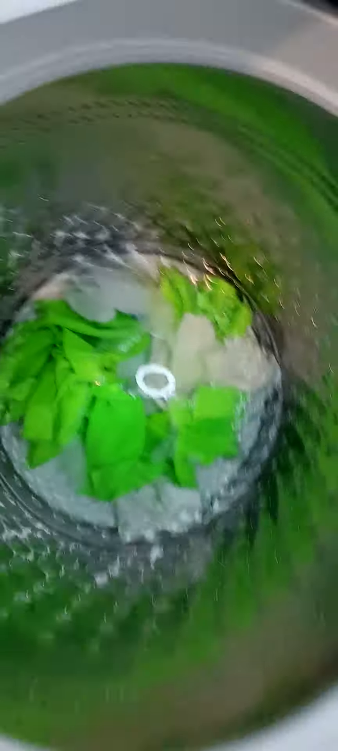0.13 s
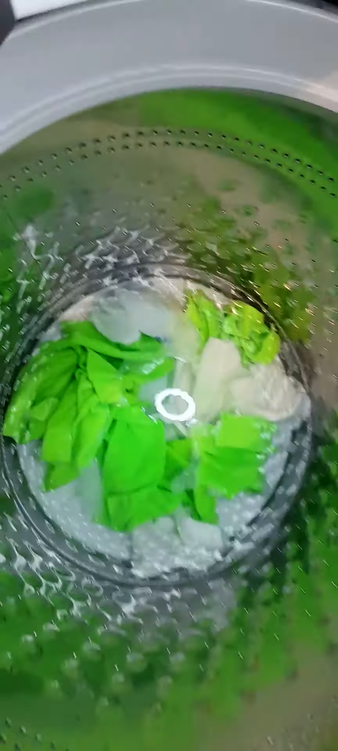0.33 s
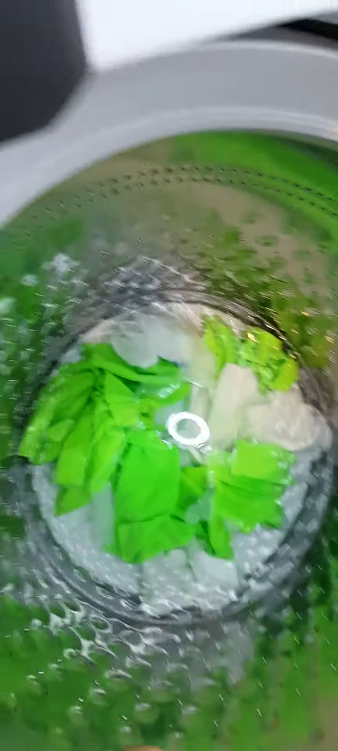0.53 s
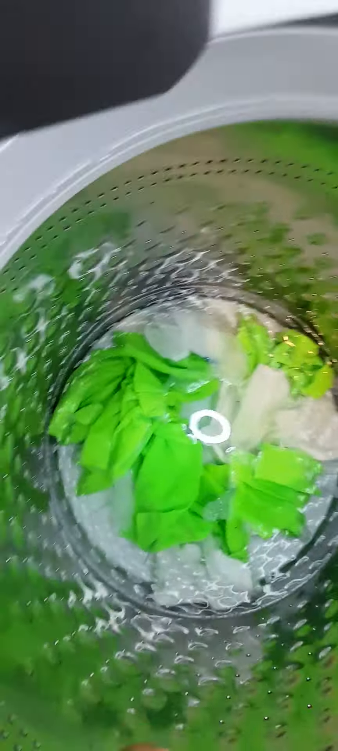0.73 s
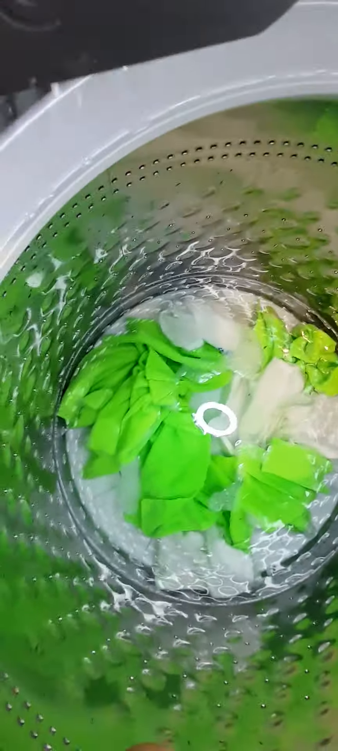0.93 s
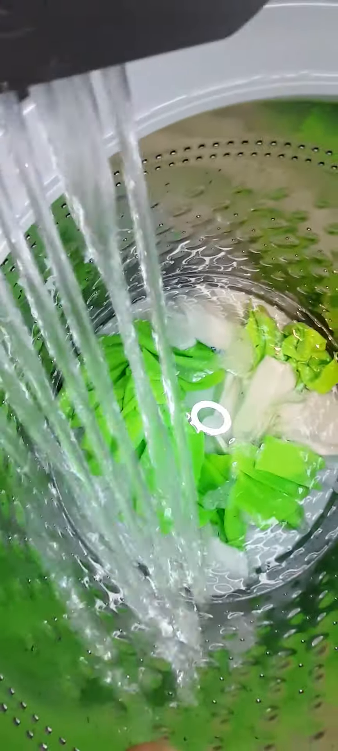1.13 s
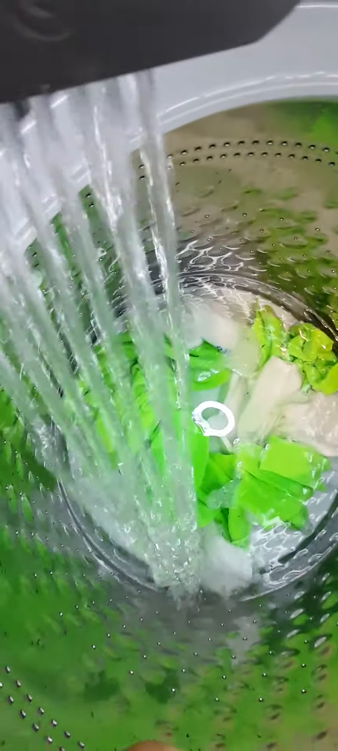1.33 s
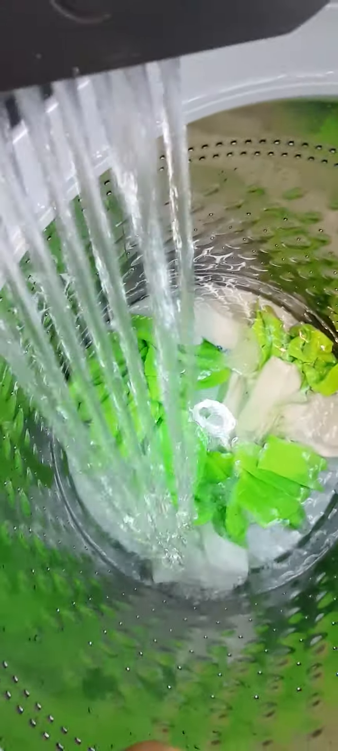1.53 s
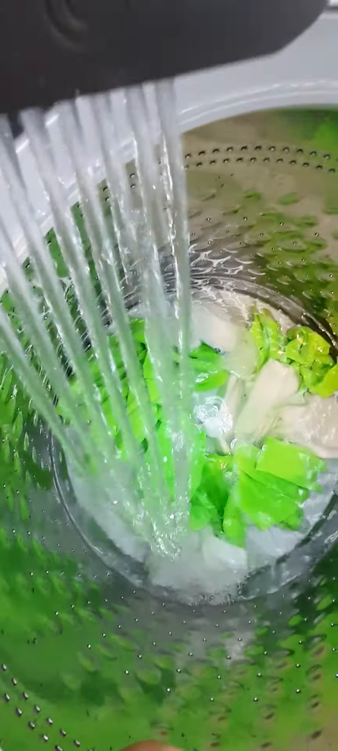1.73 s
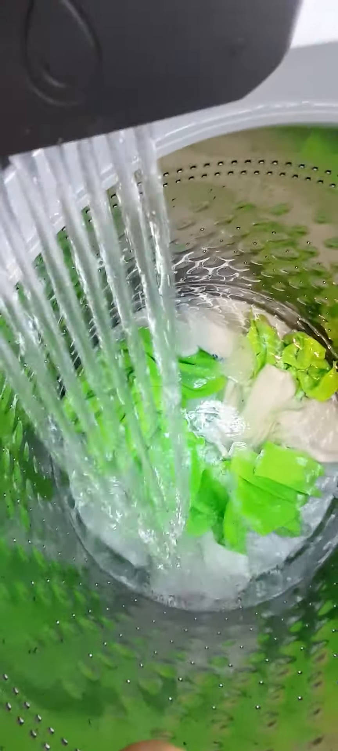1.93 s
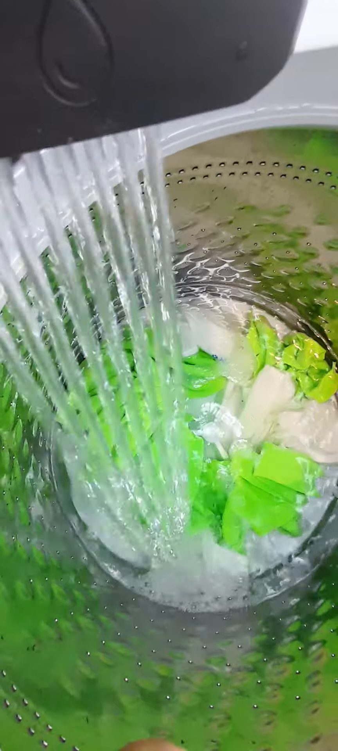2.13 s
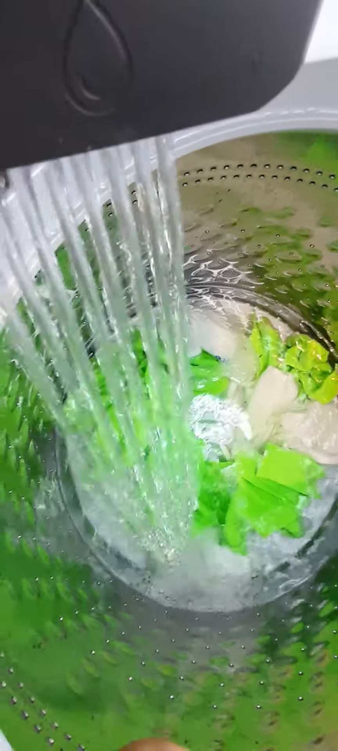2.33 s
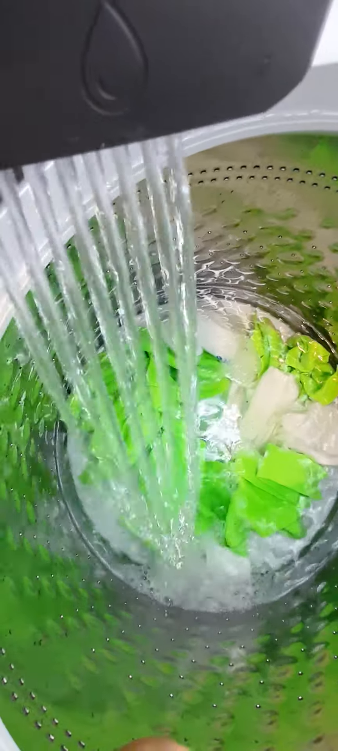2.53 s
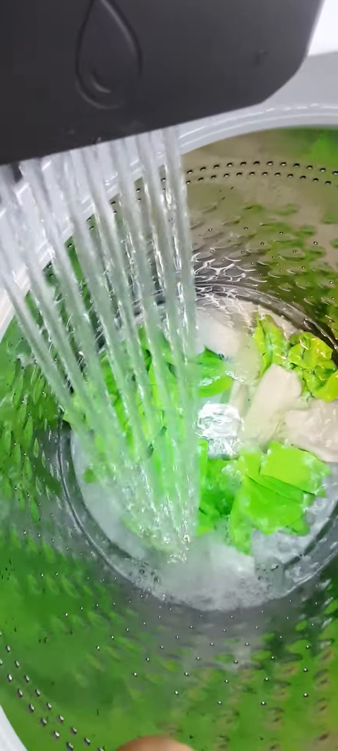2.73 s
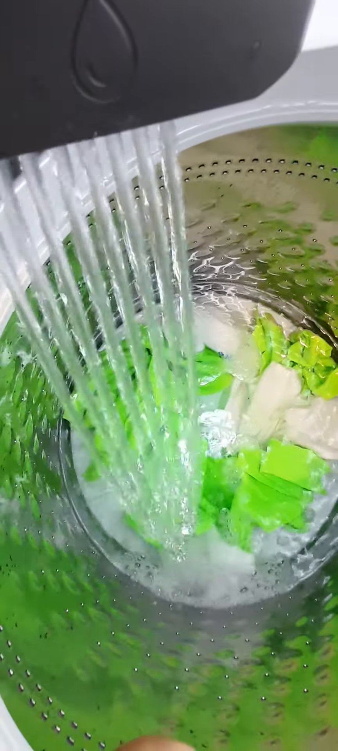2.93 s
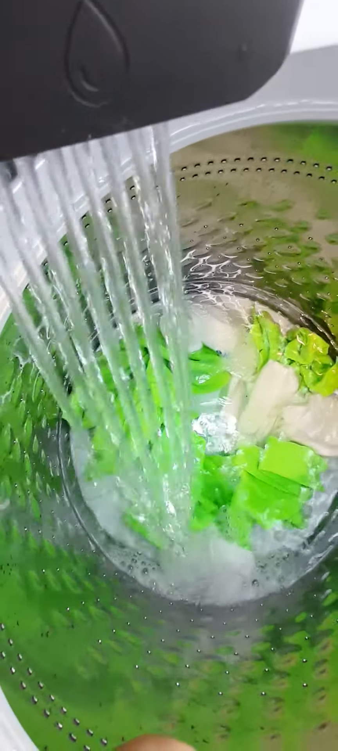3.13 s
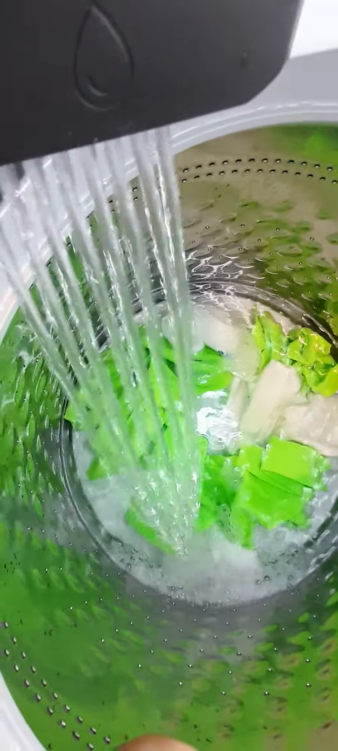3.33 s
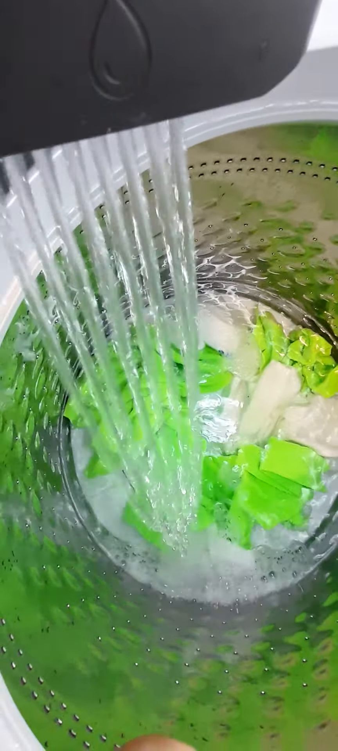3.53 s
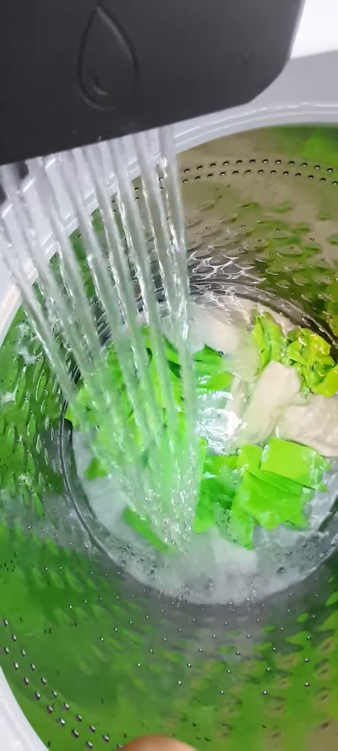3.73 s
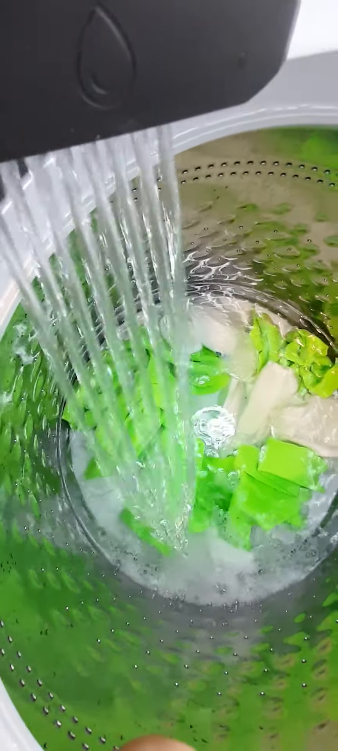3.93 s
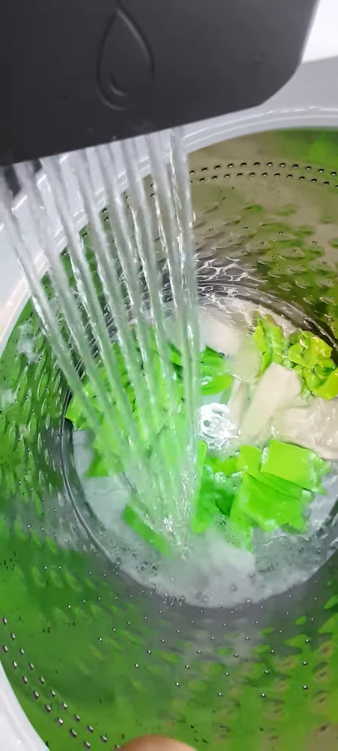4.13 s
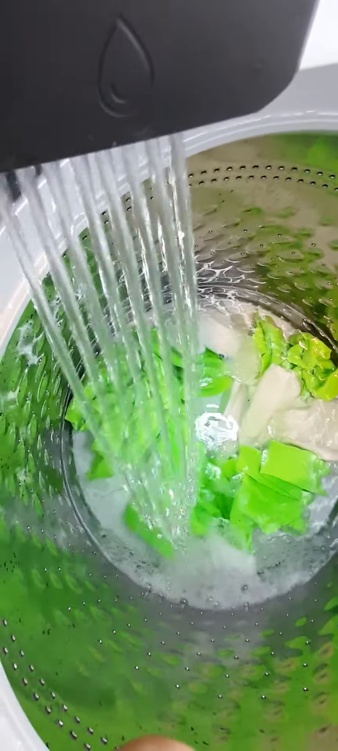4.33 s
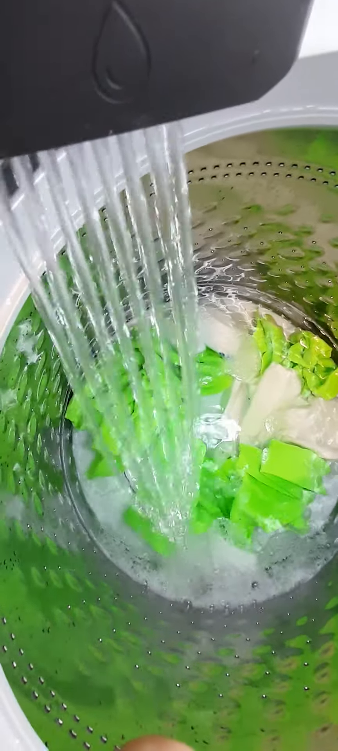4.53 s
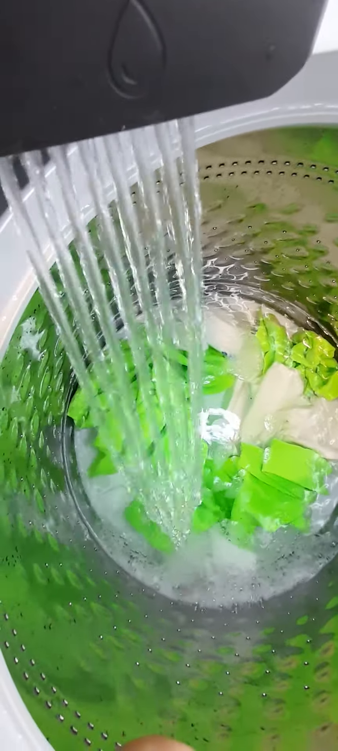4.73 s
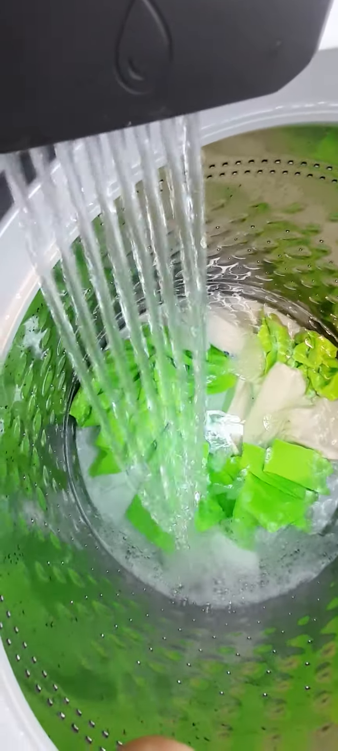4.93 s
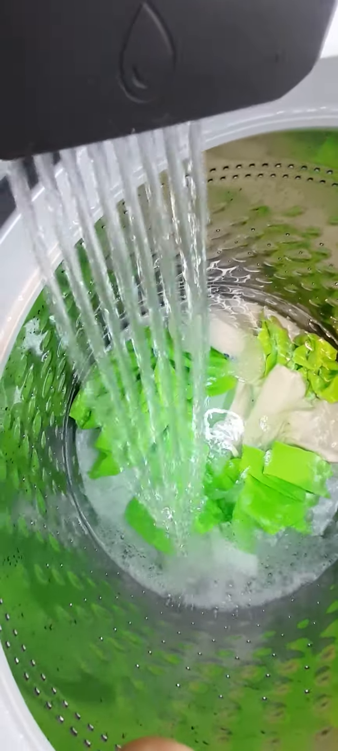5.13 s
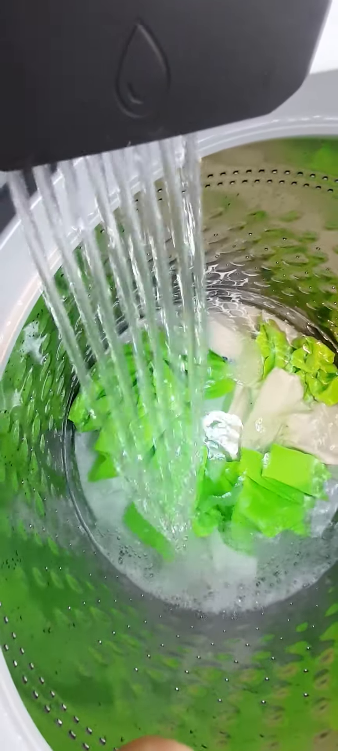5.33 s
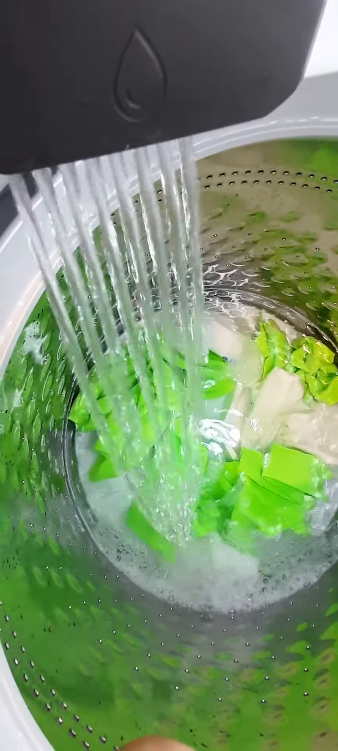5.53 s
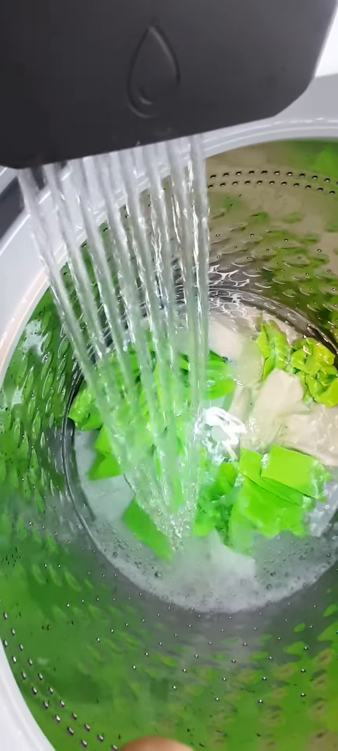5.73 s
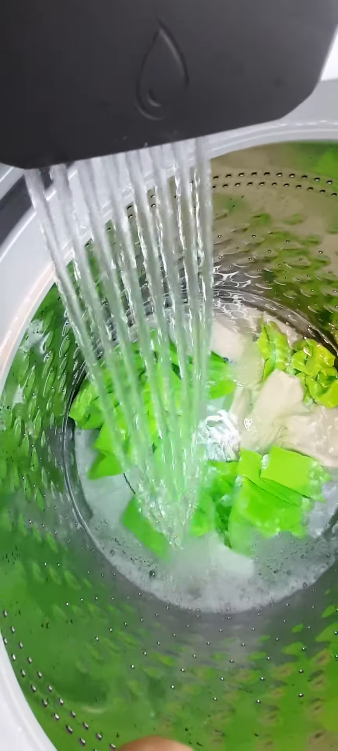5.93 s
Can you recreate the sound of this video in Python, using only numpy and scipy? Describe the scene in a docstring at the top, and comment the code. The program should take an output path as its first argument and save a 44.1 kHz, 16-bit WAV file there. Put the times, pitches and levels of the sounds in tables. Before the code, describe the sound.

Near silence with light ticks, then abruptly a strong water spray inside a hollow steel drum. The first hit is loudest and brightest, with a low thump and electrical hum beneath. Within half a second it softens onto soaked cloth and shallow water, staying a constant rushing hiss sprinkled with fat drop slaps and rising bubble gulps. Close stereo microphone just above the drum, indoors; the water is still running at the end.

```python
"""Laundry: a top-loading washing machine starts to fill, heard from just above the open drum.
After faint ticks over a quiet room the inlet valve opens with a mains hum (harmonics) and the tub booms.
A fan of jets sweeps down the steel wall onto the laundry: random impacts with dense echoes make the hiss,
and drive resonators for the hollow drum. Fat drops slap as noise bursts; bubbles are short rising rings."""
import sys
import numpy as np
from scipy import signal
from scipy.fft import rfft, irfft, next_fast_len
from scipy.io import wavfile

SR = 44100
rng = np.random.default_rng(int(sys.argv[2]) if len(sys.argv) > 2 else 0)


def file_out(sig):
    """Save sig as 16-bit WAV at sys.argv[1]."""
    # one column per channel
    cols = np.atleast_2d(sig).T
    # limit, then scale
    lim = np.clip(cols, -1, 1)
    pcm = np.round(lim * 32767).astype(np.int16)
    wavfile.write(sys.argv[1], SR, pcm)


N = 268128


def from_db(db):
    """Decibels to amplitude gain."""
    return 10 ** (np.asarray(db) / 20)


def rms_one(x):
    """Scale to unit power."""
    return x / np.sqrt(np.mean(x ** 2) + 1e-20)


def at_hz(points, hz):
    """Read a spectrum on a log-frequency axis."""
    knots_hz, values = np.transpose(points)
    return np.interp(np.log(hz + 1e-9), np.log(knots_hz), values)


def panned(pan_db):
    """Left and right gains for a left-right level difference."""
    return from_db(np.array([[.5], [-.5]]) * pan_db)


def coloured(x, spectrum, pan=None):
    """Filter to a smooth spectrum, optionally leaning left or right by frequency."""
    size = next_fast_len(x.shape[-1] + 2048)
    hz = np.fft.rfftfreq(size, 1 / SR)
    gain = from_db(at_hz(spectrum, hz))
    if pan is not None:
        gain = gain * panned(at_hz(pan, hz))
    return irfft(rfft(x, size) * gain, size)[..., :x.shape[-1]]


def drift(rate_hz):
    """Slow random wander of unit rms: noise through two equal low-pass poles, run every 20 samples."""
    r = np.exp(-40 * np.pi * rate_hz / SR)
    noise = rng.standard_normal(N // 20 + 2002)
    slow = signal.lfilter([1], [1, -2 * r, r * r], noise)[2000:]  # drop the filter's start-up
    return np.interp(np.arange(N) / 20, np.arange(len(slow)), rms_one(slow))


def stereo_noise(side_db):
    """White noise common to both ears plus an opposed part at side_db."""
    mid, side = rng.standard_normal((2, N))
    return mid + from_db(side_db) * side * [[1], [-1]]


def add(out, s, sound):
    """Mix a short sound in at s seconds."""
    start = int(np.clip(s * SR, 0, N - 1))
    out[:, start:start + sound.shape[-1]] += sound[..., :N - start]


def ramp(start_s, length_s):
    """Rise from 0 to 1 over a span of time."""
    return np.clip((np.arange(N) / SR - start_s) / length_s, 0, 1)


def swells(rows, attack_db_per_s, release_db_per_s):
    """Gain of events that each swell, hold and fade; the strongest one leads."""
    t = np.arange(N) / SR
    levels_db = []
    for full_s, held_s, level_db in rows:
        attack_db = attack_db_per_s * np.maximum(full_s - t, 0)
        release_db = release_db_per_s * np.maximum(t - full_s - held_s, 0)
        levels_db.append(level_db - attack_db - release_db)
    return from_db(np.maximum(np.max(levels_db, axis=0), -200))


def surge(peak_s, db, rise_s, settle_s):
    """Extra decibels that build to a peak and settle back."""
    return db * (ramp(peak_s - rise_s, rise_s) - ramp(peak_s, settle_s))


def impacts(per_s, spread_db, largest):
    """Drops land at random in each ear, many small and few large; unit power."""
    sizes = from_db(spread_db * np.minimum(rng.exponential(1, (2, N)), largest))
    signs = rng.choice([-1, 1], (2, N))
    landed = rng.random((2, N)) < per_s / SR
    return rms_one(sizes * signs * landed)


def drum_echoes(x, t60_s, wet_db):
    """The steel wall scatters each impact into a short dense tail at both ears."""
    t = np.arange(SR // 8) / SR
    tail = rng.standard_normal((2, len(t))) * from_db(-60 * t / t60_s)
    tail /= np.sqrt(np.sum(tail ** 2, axis=1, keepdims=True))
    mono = x[:1] + x[1:]
    return x + from_db(wet_db) * signal.oaconvolve(mono, tail, axes=1)[:, :N]


def bursts(events, spectrum, t60_s, crack_t60_s, crack_db):
    """Each small blow is a crack plus a ragged scatter of noise, coloured about its own centre."""
    ragged_db = 5
    out, t = np.zeros((2, N)), np.arange(SR // 8) / SR
    shape = from_db(-60 * t / t60_s) + from_db(crack_db - 60 * t / crack_t60_s)
    knots_s = t[::64]
    for start_s, level_db, centre_hz in events:
        ragged = from_db(ragged_db * np.interp(t, knots_s, rng.uniform(-1, 1, len(knots_s))))
        noise = rng.standard_normal((2, len(t))) * shape * ragged
        burst = coloured(noise, np.array(spectrum) * [centre_hz, 1])
        add(out, start_s, from_db(level_db) * burst / np.abs(burst.mean(0)).max())
    return out


def quiet_room():
    """Low filtered-noise rumble, a faint swelling hiss and a few light ticks."""
    # room rumble filter: hz, gain_db
    room_colour = [(20, -30), (32, -27), (42, -14), (56, 1), (66, -5), (80, -1), (110, -4.5), (135, -16),
                   (184, -28), (280, -26.5), (330, -20), (380, -33), (600, -39.5), (2000, -47)]
    # faint hiss filter: hz, gain_db
    hiss_colour = [(1760, -38), (3000, -16), (4470, -14), (5920, -10), (7350, -1.5), (8950, -10),
                   (15100, -1), (16000, -16)]
    # hiss swells: full_from_s, held_s, level_db (before trim)
    hiss_swells = [(0.11, 0.03, -71), (0.35, 0.04, -71.5), (0.48, 0.046, -73)]
    # light ticks: start_s, peak_db (before trim), centre_hz
    ticks = [(0.203, -54, 850), (0.264, -51, 750), (0.351, -55, 700), (0.588, -61, 950)]
    # tick filter: multiple_of_centre, gain_db
    tick_colour = [(.2, 1), (.5, 5), (1.2, -8), (2.2, -22), (4.5, -18), (10, -19), (20, -28)]
    room_db, hiss_db, fade_db_per_s = -59, -77.5, 130

    low_noise = signal.lfilter([1], [1, -.8], stereo_noise(side_db=-10.5))
    rumble = from_db(room_db) * rms_one(coloured(low_noise, room_colour))
    level = from_db(hiss_db + 1.2 * drift(15))
    level = level + from_db(-3.5) * swells(hiss_swells, fade_db_per_s, fade_db_per_s)
    hiss = level * rms_one(coloured(stereo_noise(side_db=0.5), hiss_colour))
    ticking = bursts(ticks, tick_colour, t60_s=0.049, crack_t60_s=.006, crack_db=3)
    return rumble + hiss + from_db(-2.5) * ticking


def valve(level_db):
    """The solenoid buzzes at harmonics of twice the mains rate, with slight phase wander."""
    # hum partials: multiple_of_hum_rate, relative_db, left_right_db
    partials = [(1, 1.5, 6.5), (2, -17.5, 6), (3, -10.5, 0.5), (4, -35, 0)]
    hum_hz = 120
    phase = 2 * np.pi * hum_hz * np.arange(N) / SR + .08 * drift(8)  # radians
    tone = 0
    for multiple, db, pan_db in partials:
        tone = tone + from_db(db) * panned(pan_db) * np.sin(round(multiple) * phase)
    return np.sqrt(2) * tone * from_db(level_db)


def tub(level_db, wander_rad, rumble_db):
    """The jets shake the tub: a phase-wandering sine at its lowest resonance, with rumble around it."""
    # rumble filter: hz, gain_db
    rumble_colour = [(20, -48), (40, -44), (52, -24), (62, -20), (72, 6.5), (90, 4), (103, 14.5), (130, -3),
                     (170, -12.5), (300, -7.5), (800, -86)]
    tub_hz = 72.9
    phase = 2 * np.pi * tub_hz * np.arange(N) / SR + wander_rad * drift(6.8)
    boom = np.sqrt(2) * np.sin(phase)
    rumble = rms_one(coloured(stereo_noise(side_db=-25), rumble_colour))
    return from_db(level_db) * rms_one(boom + from_db(rumble_db) * rumble)


def sweep():
    """The first jets drum on the wall and splash through shallow water: one stream, two colours."""
    # passes over the steel wall: full_from_s, held_s, level_db
    wall_passes = [(1.09, 0.045, -25.5), (1.15, 0.17, -28), (1.38, 0.033, -28.5), (1.49, 0.05, -32),
                   (1.565, 0.018, -31.5)]
    # passes through shallow water by the load: full_from_s, held_s, level_db
    load_passes = [(0.992, 0.004, -44), (1.38, 0.05, -27.5), (1.555, 0.022, -33.5), (1.725, 0.015, -34)]
    # wall splash filter: hz, gain_db
    wall_colour = [(100, -14.5), (200, -8), (300, 1), (450, -12), (900, -8), (1800, -8), (2200, 6.5),
                   (2700, -2), (3300, -3), (4100, -6), (5200, -11), (8000, -15)]
    # load splash filter: hz, gain_db
    load_colour = [(300, -20), (700, -4), (1100, 5), (1600, 5.5), (2400, 1), (3500, -11), (8000, -14)]
    attack_db_per_s, release_db_per_s = 380, 170

    wall = swells(wall_passes, attack_db_per_s, release_db_per_s)
    load = swells(load_passes, attack_db_per_s, release_db_per_s)
    drops = impacts(per_s=5000, spread_db=3, largest=2.8)
    splash = drum_echoes(drops, t60_s=0.061, wet_db=-2.0)
    return wall * rms_one(coloured(splash, wall_colour)) + load * rms_one(coloured(splash, load_colour))


def flow():
    """Jet strength in dB about steady flow: a climb, a pressure overshoot that settles, one falter."""
    full_s, rise_db_per_s = 1.11, 185
    surge_db, surge_s = 4.5, 0.026
    falter_s, falter_length_s, falter_db = 1.603, 0.007, 6
    t = np.arange(N) / SR
    climb = rise_db_per_s * np.clip(t - full_s, -1, 0)
    overshoot = surge_db * np.exp(-np.abs(t - full_s) / surge_s)
    falter = falter_db * np.exp(-((t - falter_s) / falter_length_s) ** 2)
    return climb + overshoot - falter


def bubbles(per_s, low_hz, high_hz, cycles, range_db, size):
    """Bubbles of many sizes, most of them faint, each a brief ring that rises a little; unit power."""
    out, t = np.zeros((2, N)), np.arange(size) / SR
    total = int(np.clip(per_s, 1, 2000) * N / SR)
    for when, pitch, strength, side in rng.random((total, 4)):
        hz = low_hz * (high_hz / low_hz) ** pitch
        decay = from_db(-60 * t * hz / cycles)  # 60 dB in this many cycles
        ring = np.sin(2 * np.pi * hz * t * (1 + t)) * decay
        add(out, when * N / SR, ring * from_db(range_db * strength ** 2) * panned(10 * (side - .5)))
    return rms_one(out)


def spray(clumps, sizzle_db, jets, clump_db, mist_db, foam_db, patchy_db):
    """Jets, each with its own clumps of drops and echoes, over noise mist and bursting foam; unit power."""
    # hiss filter: hz, gain_db
    hiss_colour = [(170, -28), (300, -14), (500, -6), (900, -23.5), (1800, -8), (3000, -6.5), (4300, 1.5),
                   (5600, -3.5), (7000, 0.5), (7700, 2.5), (8800, -9), (10600, -7.5), (12900, -3),
                   (15500, -8.5)]
    # side the hiss leans to: hz, left_right_db
    hiss_pan = [(170, -5), (500, 0), (1800, 0), (3000, 8), (4300, 2), (5600, 0), (7300, -4.5), (8500, 8.5),
                (10400, 0), (13000, -0.5), (15500, 0.5)]
    drops = 0
    for _ in range(jets):
        jet = impacts(per_s=650, spread_db=3.5, largest=3.5) * from_db(clump_db * drift(44))
        drops = drops + drum_echoes(jet, t60_s=0.063, wet_db=-3)
    mist = from_db(mist_db) * rng.standard_normal((2, N))
    foam = bubbles(per_s=400, low_hz=2966, high_hz=12760, cycles=59, range_db=7.5, size=512)
    rest = rms_one(drops) + mist + from_db(foam_db) * foam
    # coarse, medium and fine drops each come in flurries of their own
    hiss = 0
    for edge_hz in (3200, 5400, 8800):
        low_pass = signal.butter(3, edge_hz, fs=SR, output="sos")
        band = signal.sosfiltfilt(low_pass, rest)
        hiss = hiss + band * from_db(patchy_db * drift(24))
        rest = rest - band
    hiss = hiss + rest * from_db(sizzle_db + 0.63 * drift(33))
    return rms_one(coloured(hiss * clumps, hiss_colour, hiss_pan))


def drum(clumps, steel_db, floor_db, pool_db, flicker_db, flicker_hz):
    """Drops ring the drum: pool feeds low resonances, floor the middle, bare steel the high ones."""
    # drum resonances: centre_hz, width_hz (before Q limit), relative_db, left_right_db, left_lead_rad
    resonances = [(169, 124, -47.5, -5, 0.5), (260.4, 35, -47.5, -1, 1.1), (389.4, 99, -46.5, -12, -0.1),
                  (486.5, 35, -44.5, 0, -0.4), (548.5, 109, -40.5, -0.5, 0.9), (621, 36, -40.5, -0.5, -1.4),
                  (669, 25, -46.5, -8, -2), (768.6, 42, -47, -11, 2), (781, 104, -49, 18, -2.5),
                  (894, 300, -44, 4.5, -2), (964, 93, -50, -9, 2), (1107, 137, -45.5, 14.5, -1.5),
                  (1175, 51, -49, -5, 4), (1315, 142, -42, 4, 3.5), (1453, 127, -46, -8, 1),
                  (1541, 85, -45.5, 7.5, -1.2), (1603, 24, -53.5, 24.5, 2), (1825, 210, -43.5, -6, -3.0),
                  (1978, 170, -42, 4, -1.82), (2288, 184, -40, 10, -1.4), (2443, 72, -47, 4, -2.5),
                  (2566, 13, -45.5, -11.5, 2.5), (2720, 103, -65, 2, 4), (3063, 700, -33.5, 1.5, -2),
                  (3396, 44, -41, 10, 4), (3666, 27, -37, -1, -1.83), (3914, 76, -41, -8, 0.55)]
    sharpest_q = 45
    out = np.zeros((2, N))
    blows = impacts(per_s=2600, spread_db=3.5, largest=3.4)[0] * clumps
    # heavy flow sheets over the steel and damps it, so the ringing grows only so far
    drives = [from_db(np.minimum(db, 3.5)) for db in (pool_db, floor_db, steel_db)]
    for hz, width_hz, db, pan_db, lead_rad in resonances:
        drive = drives[int(hz > 850) + int(hz > 2100)]
        # each drop lands somewhere else, so it meets each resonance with its own strength
        struck = blows * rng.uniform(-0.99, 1, N) * from_db(flicker_db * drift(flicker_hz))
        pole = np.exp((-np.pi * max(width_hz, hz / sharpest_q) + 2j * np.pi * hz) / SR)
        wave = signal.lfilter([1], [1, -2 * pole, pole ** 2], struck + 1e-18)
        wave *= from_db(db) * drive / np.std(wave.real)
        # a standing wave meets the two ears with different level and phase
        ears = panned(pan_db) * np.exp(np.array([[.5j], [-.5j]]) * lead_rad)
        out += (wave * ears).real
    return out


def splats():
    """Fat drops slap the wet load: cracks with scattered noise tails."""
    # slaps: start_s, peak_db (before trim), centre_hz
    slaps = [(1.4983, -12, 4420), (1.552, -16, 3580), (1.6192, -12, 3640), (1.908, -20, 7060),
             (1.971, -13, 4040), (2.0843, -16, 3550), (2.2895, -16, 7350), (2.986, -14, 3930),
             (3.3842, -15, 4020), (3.6777, -16, 4100), (3.765, -14, 7900), (3.8757, -14, 7300),
             (4.2827, -12.5, 3080), (4.4244, -16.5, 7400), (4.5226, -11, 4860), (4.649, -10.5, 4540),
             (5.1597, -16, 8350), (5.3005, -13, 6200), (5.3506, -13, 3970), (5.6174, -15, 7250),
             (5.684, -8, 4600)]
    # slap filter: multiple_of_centre, gain_db
    slap_colour = [(.1, -18), (.4, -25), (.75, 0), (1, 8.5), (1.4, 5), (2.2, -21), (4, -15)]
    return from_db(-2.5) * bursts(slaps, slap_colour, t60_s=0.1, crack_t60_s=0.0054, crack_db=-10)


def gulps(cycles, rise_per_s, scatter, spread_s, count):
    """An air pocket driven under water breaks into a few bubbles, each ringing and rising in pitch."""
    # air pockets: start_s, level_db (before trim), pitch_hz
    pockets = [(1.948, -18.5, 472), (2.015, -18.5, 620), (2.178, -22.5, 482), (2.389, -20.5, 665),
               (2.984, -22, 516), (3.32, -19, 515), (3.589, -22, 470), (3.894, -22, 545), (3.904, -13, 532),
               (4.175, -18.5, 610), (4.443, -18.5, 518), (4.524, -21, 388), (4.844, -17, 493),
               (4.991, -19, 605), (5.531, -18.5, 544), (6.055, -18.5, 627)]
    out, t = np.zeros((2, N)), np.arange(SR // 8) / SR
    swell = 1 - np.exp(-t / 0.0015)
    for start_s, level_db, pitch_hz in pockets:
        for k, (detune, wait, side) in enumerate(rng.uniform(-1, 1, (count, 3))):
            hz = pitch_hz * (1 + scatter * detune * (k > 0))  # first bubble keeps the listed pitch
            decay = from_db(-60 * t * hz / cycles)
            ring = np.sin(2 * np.pi * hz * t * (1 + rise_per_s * t)) * decay * swell
            gain = from_db(level_db - 4.8 * k) * panned(2 * side - 2)
            add(out, start_s + k * spread_s * abs(wait), gain * ring)
    return from_db(-2.5) * out


def scene():
    """The valve opens; flow drives the wet sounds, bright on bare steel, then gurgling in the soaked load."""
    # pool churning as it gathers: time_s, relative_db
    churn = [(1.0, -3.5), (1.6, -3.5), (2.03, 1.5), (2.6, -3), (3.05, 0.5), (3.7, -0.5), (3.92, 1),
             (4.1, 0.5), (4.5, 0.5), (4.7, -1), (4.95, 1.5), (5.2, -0.5), (6.08, 0)]
    open_s, opening_s, machine_rise_s = 0.97, 0.029, 0.039
    # jets leave the bare wall for the load, which then soaks
    landing_s, landing_length_s, soaking_s = 1.35, 0.037, 0.23
    sizzle_base_db, bare_sizzle_db, bare_ring_db, unhit_floor_db = 2, 3.0, 1.5, -4
    spray_db, bubbles_db, boom_base_db, hum_base_db = -23, -42, -43, -39

    flow_db = flow()
    bare, landed = 1 - ramp(landing_s, soaking_s), ramp(landing_s, landing_length_s)
    churn_s, churn_points_db = np.transpose(churn)
    churn_db = np.interp(np.arange(N) / SR, churn_s, churn_points_db)

    # first blow of the jets shakes the tub; the hum swells just after
    boom_db = boom_base_db + surge(peak_s=1.104, db=16.6, rise_s=0.21, settle_s=0.29) + 1.0 * drift(8)
    hum_db = hum_base_db + surge(peak_s=1.18, db=5.6, rise_s=0.09, settle_s=0.18)
    hum_db = hum_db + 0.25 * flow_db + 0.7 * drift(7.2)
    machine = valve(hum_db) + tub(boom_db, wander_rad=0.96, rumble_db=4.0)

    # the jets wander, so each surface takes a changing share; even weak flow stirs floor and pool
    steel_db = flow_db + bare_ring_db * bare + 1.0 * drift(4.6)
    pool_db = 0.26 * flow_db + churn_db + 0.92 * drift(9.3)
    # once the load soaks, the floor splash follows the churning
    floor_db = 0.35 * flow_db + unhit_floor_db * (1 - landed)
    floor_db = floor_db + 0.36 * (1 - bare) * pool_db + 0.9 * drift(10.5)
    sizzle_db = sizzle_base_db + bare_sizzle_db * bare
    # the jets break up unevenly, so the drops arrive in clumps
    clumps = from_db(0.65 * drift(26) + .5 * drift(160))

    water = sweep()
    hiss = spray(clumps, sizzle_db, jets=5, clump_db=3.0, mist_db=-1.5, foam_db=-14, patchy_db=1.35)
    water += from_db(spray_db + flow_db) * hiss
    ringing = drum(clumps, steel_db, floor_db, pool_db, flicker_db=1.5, flicker_hz=13.3)
    water += from_db(-0.78) * ringing
    pool = bubbles(per_s=70, low_hz=367.6, high_hz=699, cycles=73, range_db=14, size=4096)
    water += from_db(bubbles_db + pool_db) * pool
    water += splats()
    water += gulps(cycles=39, rise_per_s=0.53, scatter=0.11, spread_s=.012, count=3)
    return quiet_room() + ramp(open_s, machine_rise_s) * machine + ramp(open_s, opening_s) * water


def record(dry):
    """Cut the top steeply with an elliptic low-pass."""
    cutoff_hz = 15900
    return signal.sosfilt(signal.ellip(12, .1, 80, cutoff_hz, fs=SR, output="sos"), dry)


dry = scene()
out = record(dry)
file_out(out)
```